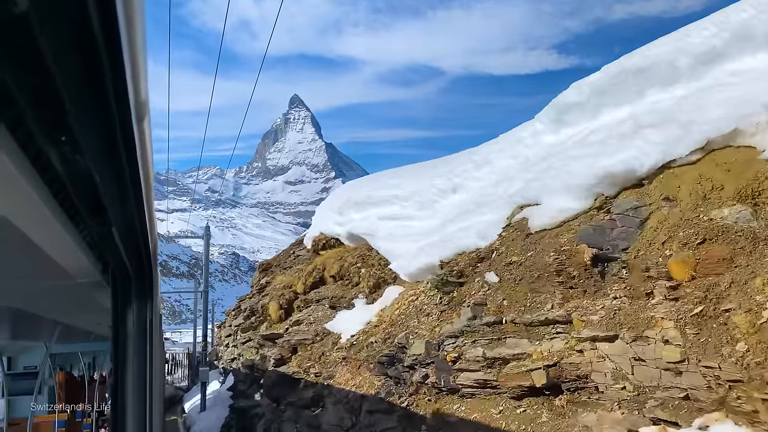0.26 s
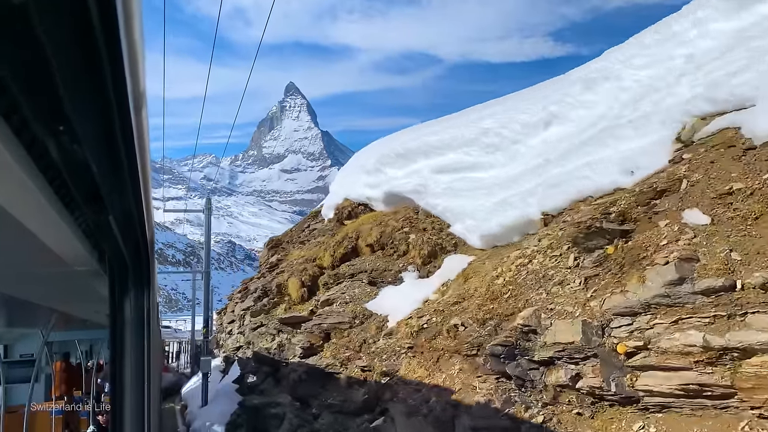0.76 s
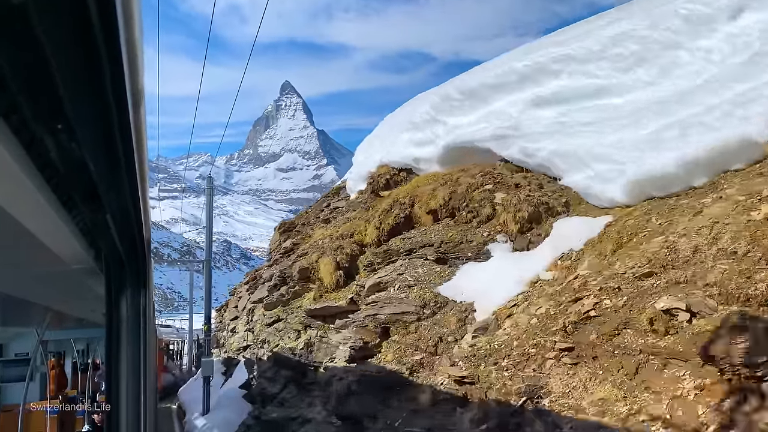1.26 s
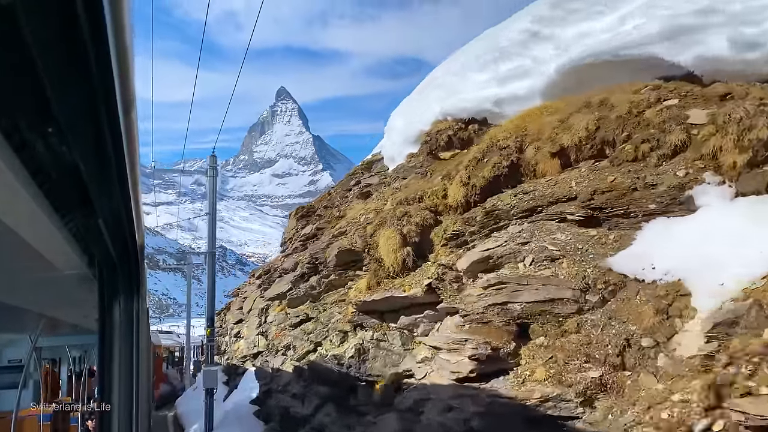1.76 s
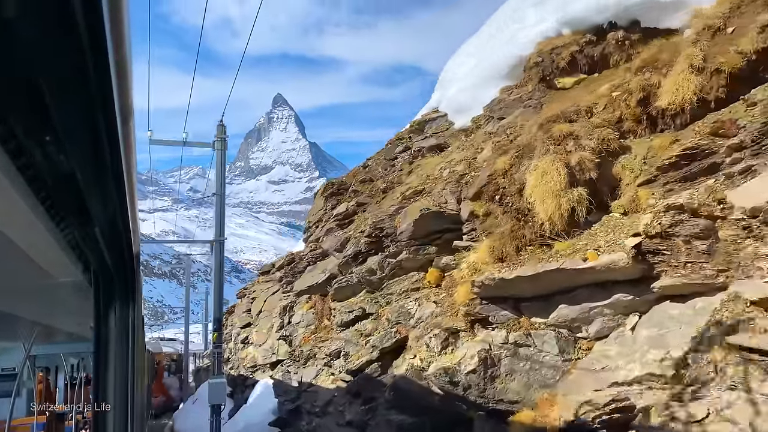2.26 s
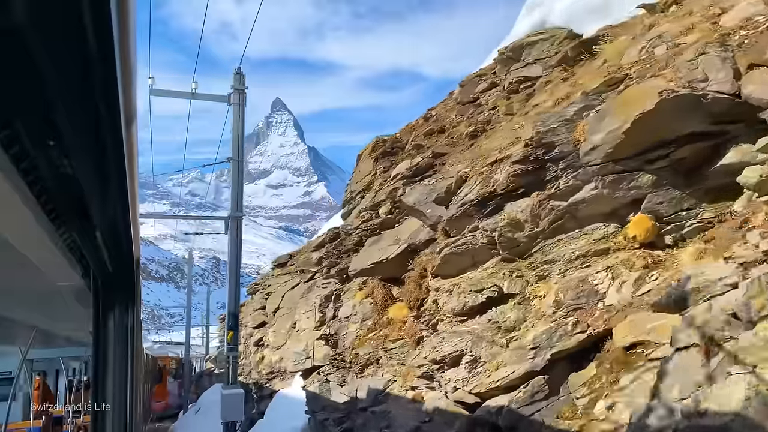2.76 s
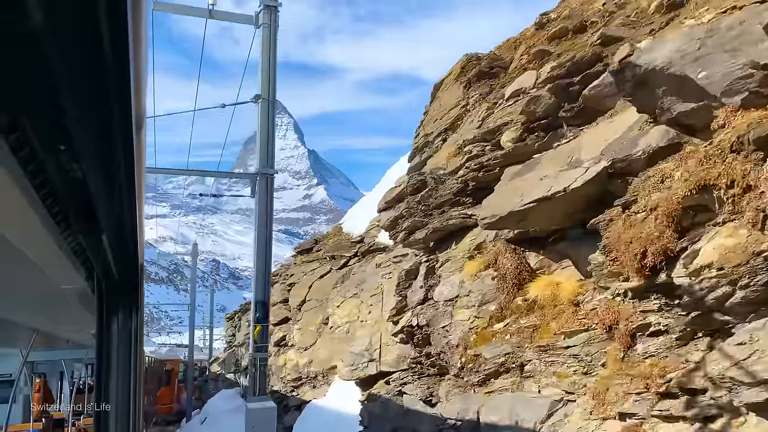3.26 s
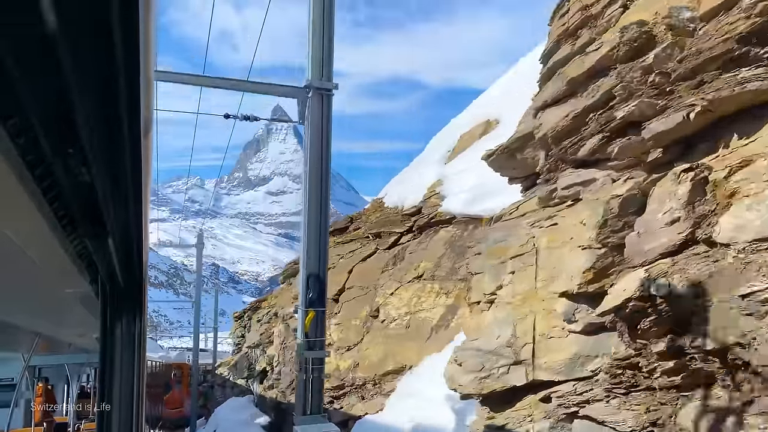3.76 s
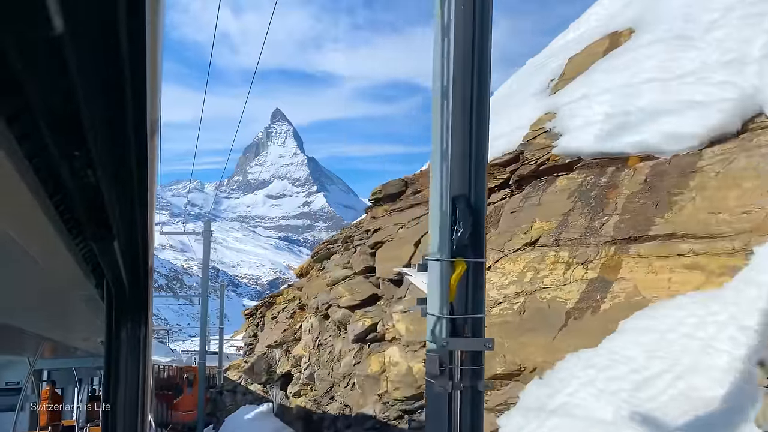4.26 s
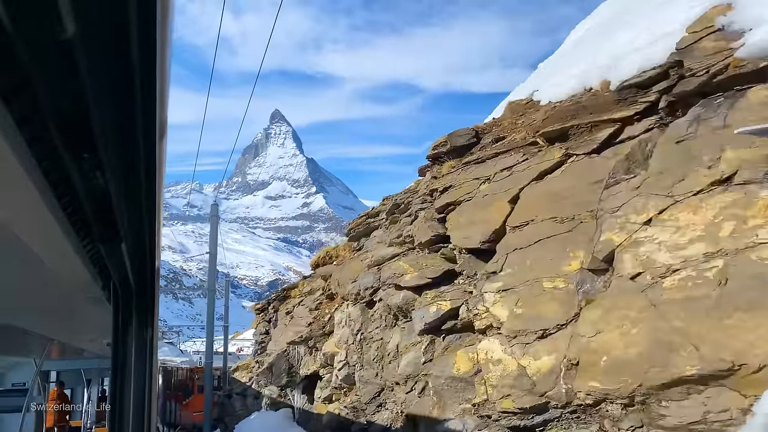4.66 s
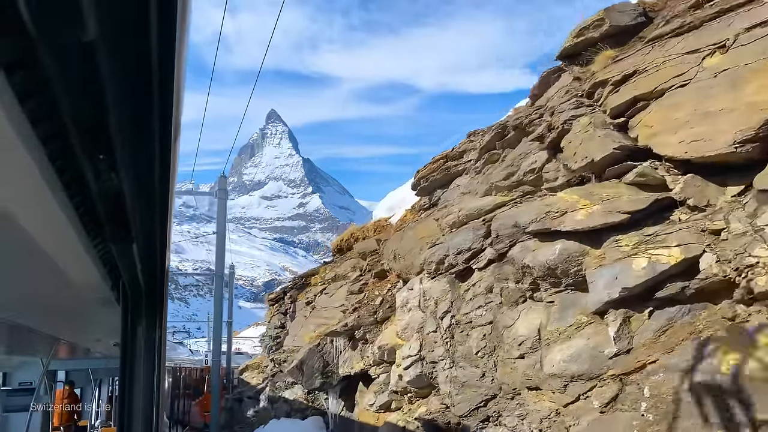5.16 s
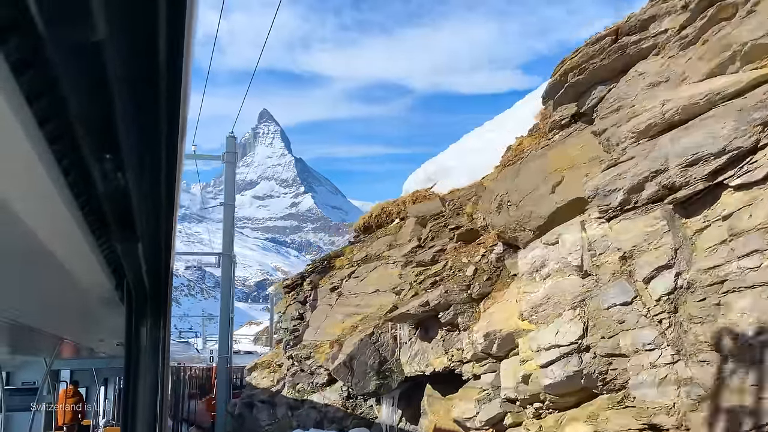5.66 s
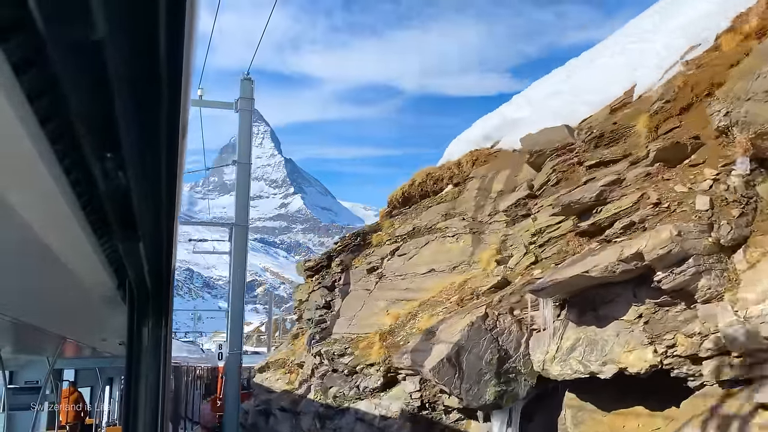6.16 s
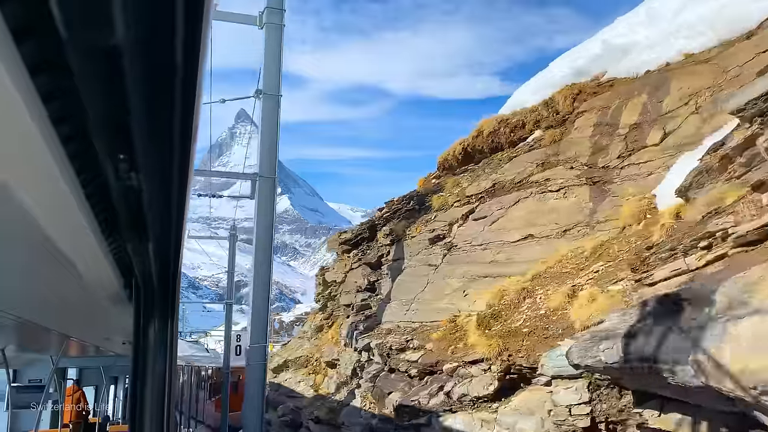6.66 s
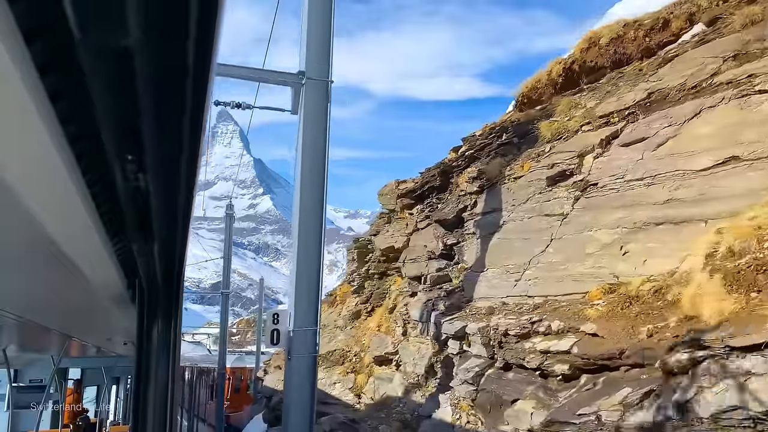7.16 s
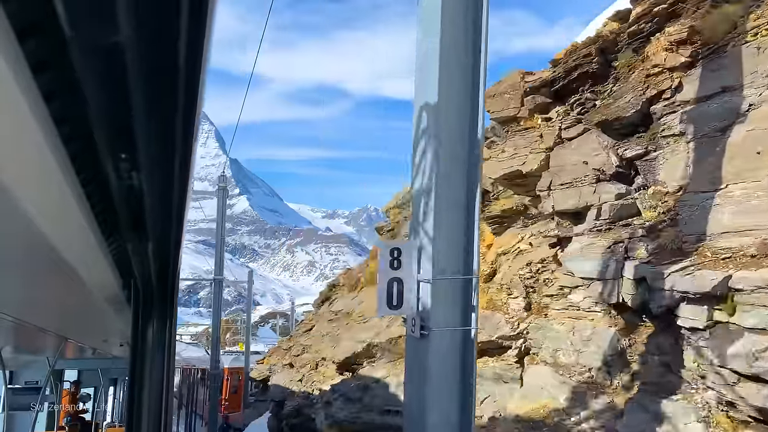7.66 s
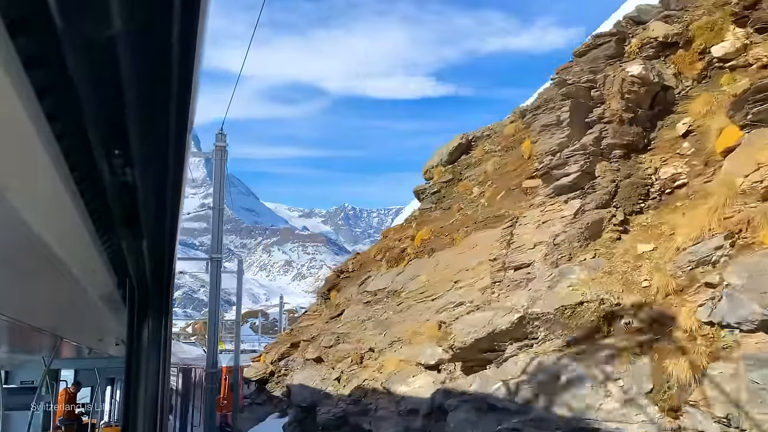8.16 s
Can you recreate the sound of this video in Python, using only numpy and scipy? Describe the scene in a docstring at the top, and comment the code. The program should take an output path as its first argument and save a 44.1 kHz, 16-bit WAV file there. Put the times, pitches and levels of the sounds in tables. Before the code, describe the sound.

Close at an open carriage window, an electric rack train climbs steadily past a rock wall. Deep floor boom, bogie roar and a wavering cog-tooth drone dominate, under rolling noise and faint steel fizz. Light scuffs come early, an air valve hisses off at about two and a half seconds, dull knocks thump near six, and a wheel flange scrapes and squeals thinly towards the end.

```python
"""A rumbling carriage floor and droning cog teeth, as an electric rack train climbs past a rock cutting.
Close by, at an open carriage window, come boom and roar from below, rolling, steel fizz, gear whine
and a faint inverter whine, all as shaped noise; the teeth are wandering, beating tones.
Scuffs are noise puffs, pings and knocks short sines; an air valve blows off once as a fading noise jet.
Near the end a wheel flange scrapes and sings as noise-driven resonances, and the rail groans upward."""
import sys
import numpy as np
from scipy import signal
from scipy.fft import rfft, irfft
from scipy.io import wavfile
from scipy.ndimage import uniform_filter1d

SR = 44100
rng = np.random.default_rng(int(sys.argv[2]) if len(sys.argv) > 2 else 0)


def materialize(psi):
    """Save the field psi as 16-bit PCM at rate SR to the path in sys.argv[1].

    A 1-D psi becomes a single channel; in a 2-D psi each row is a channel.
    """
    bounded = np.clip(np.atleast_2d(psi).T, -1, 1)
    quanta = np.round(bounded * 32767).astype(np.int16)
    wavfile.write(sys.argv[1], SR, quanta)


N = 370440  # samples

# Under the carriage, loudest where the rock wall stands close:
# (time [s], floor boom [dB], bogie roar [dB], bogie hums [dB], upper roar [dB])
BODY_LEVELS = [(0.0, -22, -22, -20.5, -31), (0.7, -22.5, -20, -20, -51), (1.7, -23, -22.5, -21.5, -41),
               (2.3, -23.5, -21.5, -22.5, -33), (2.8, -20.5, -20.5, -22.5, -31),
               (3.5, -23.5, -16.5, -18.5, -34.5), (4.1, -23, -19.5, -18, -33), (4.6, -20, -23, -24, -27.5),
               (5.1, -20, -25, -24, -32), (5.5, -18.5, -24, -26, -35.5), (6.0, -24.5, -23, -22, -29),
               (6.5, -18, -20.5, -25, -34), (7.0, -19.5, -24, -28, -33), (7.6, -20, -22.5, -24, -32),
               (8.4, -21, -22.5, -26, -27)]
# Colours of floor boom, bogie roar and upper roar: (frequency [Hz], density [dB per Hz])
BOOM_COLOUR = [(12, -71), (22, -26), (30, -1), (45, 5.5), (65, 14), (105, 10.5), (140, 3), (210, 5.5),
               (280, -23), (450, -54), (1500, -85)]
ROAR_COLOUR = [(60, -58), (150, 4), (250, 3.5), (360, 2), (450, 2), (520, -8.5), (650, -10), (800, -11),
               (1000, -39), (1400, -59), (4000, -86)]
UPPER_ROAR_COLOUR = [(250, -34), (480, 6), (600, 11), (750, 2), (1000, -24), (2000, -58)]
# Narrow gearbox and panel hums, riding on the floor boom: (frequency [Hz], width [Hz], level [dB])
FLOOR_HUMS = [(134.4, 28, -5), (185.5, 4.2, -12.5), (219.6, 20, -17)]
# Hums of the bogie: (frequency [Hz], width [Hz], level [dB])
BOGIE_HUMS = [(352, 42, -6), (423.6, 45, -13), (507, 34, -17), (573.6, 41, -18.5), (655, 30, -24),
              (866.7, 38, -17)]
SHAKE_DB, SHAKE_HZ = 0.63, 7.9  # rms depth and rate of the body's random shudder

# Cog teeth entering the rack:
# (time [s], 1st multiple of the tooth rate [dB], 2nd multiple [dB], 3rd multiple [dB])
COG_LEVELS = [(0.0, -27.5, -39, -30.5), (0.7, -19, -24, -31.5), (1.3, -30.5, -27, -29.5),
              (1.85, -22.5, -25.5, -26.5), (2.4, -25, -25.5, -30), (3.0, -25, -24, -37),
              (3.6, -30.5, -33, -34), (4.03, -25.5, -15.5, -40), (4.2, -34.5, -27.5, -24.5),
              (4.6, -26, -23, -28), (4.95, -45, -22, -42.5), (5.17, -44, -27, -19), (5.4, -34, -20, -35.5),
              (5.7, -18, -34, -41), (5.95, -25, -31, -17.5), (6.3, -19, -36, -49), (6.7, -44, -23.5, -31.5),
              (7.05, -16.5, -21, -26.5), (7.5, -25.5, -34, -51), (7.9, -21.5, -34, -42),
              (8.4, -35, -32, -55)]
TEETH_HZ = 83.5  # mean tooth rate
BEAT_DB, BEAT_HZ = -3.5, 8.6  # the other pinions, in and out of step with the nearest one

# The track, thrown back by the rock wall:
# (time [s], rolling [dB], fizz of steel on steel [dB], gear whine [dB])
TRACK_LEVELS = [(0.0, -33, -45.5, -48), (0.8, -34, -49, -44.5), (1.5, -34.5, -48.5, -45),
                (2.1, -32.5, -46, -45.5), (2.7, -32.5, -47, -43), (3.5, -33.5, -44, -43),
                (4.5, -31.5, -44.5, -49), (5.2, -33, -46, -49), (6.0, -34, -45.5, -46),
                (6.7, -34.5, -46.5, -49), (7.0, -36, -48.5, -50), (7.5, -34.5, -46.5, -52),
                (8.1, -31, -44, -57), (8.4, -31.5, -46.5, -45)]
# Colours of rolling and fizz: (frequency [Hz], density [dB per Hz])
ROLL_COLOUR = [(200, -70), (500, -18), (800, 3.5), (1000, 2), (1400, -3), (1660, -2.5), (2050, -5.5),
               (2500, -12), (3100, -16), (4500, -54), (9000, -68)]
FIZZ_COLOUR = [(900, -70), (2200, -15), (3200, -2), (3900, 0), (4500, -4), (5500, -9), (7400, -12),
               (8600, -12), (9300, -14), (10300, -13), (11500, -17), (12500, -21), (13500, -22.5),
               (14500, -25), (15800, -30)]
# Inverter switching tone, sidebands and double, relative to the fizz:
# (frequency [Hz], width [Hz], level [dB])
INVERTER_TONES = [(3860, 50, -15), (4000, 18, -20), (4010, 240, -12), (4153, 20, -20), (8030, 250, -18)]
# Resonances of the gear whine: (frequency [Hz], width [Hz], level [dB])
GEAR_TONES = [(1610, 24, -3), (1668, 18, -5.5), (1748, 55, -7.5)]

# Short scuffs at rail joints; level before the rise, treble relative to the dull part:
# (time [s], level [dB], rise [s], fall by 60 dB [s], treble [dB])
SCUFF_EVENTS = [(1.145, -39, .02, 0.24, -1), (1.64, -35.5, .025, 0.46, -2), (2.0, -31, 0.06, 0.57, -5),
                (2.16, -45, .015, 0.27, -4), (4.49, -38, 0.018, .3, -6), (4.755, -35.5, .004, .2, -4)]
# Colour of the scuffs: (frequency [Hz], density [dB per Hz])
SCUFF_COLOUR = [(500, -70), (1500, -15), (3500, 1), (5000, -4), (6500, -12), (9000, -13), (12000, -13),
                (15800, -21)]
SCUFF_TOP_HZ = 5500  # split between dull and treble
# Brief metallic rings: (time [s], length [s], pitch [Hz], level [dB])
PING_EVENTS = [(1.64, .1, 5050, -55), (4.45, .1, 1645, -37), (4.73, .08, 2560, -46)]

# Colour of the air jet: (frequency [Hz], density [dB per Hz])
JET_COLOUR = [(600, -70), (1500, -25), (3000, -4), (4500, -3), (7600, -3), (8500, 0), (11500, 0),
              (12500, -1), (13500, -3), (14500, -5), (15800, -5)]
VALVE_S, OPEN_S = 2.436, 0.02  # start and opening time constant [s]
JET_BODY_HZ = 7000  # split between dull body and thin top
TOP_DB, TOP_T60 = -32, 0.73  # the thin top drops quickly; T60 in s
BODY_DB, BODY_T60 = -33, 1.3  # the duller body lingers
LEAK_DB, LEAK_T60 = -44, 4.7  # a long leak under both

# Dull knocks under the floor, level before the rise:
# (time [s], level [dB], pitch [Hz], fall by 60 dB [s])
KNOCK_EVENTS = [(5.741, -10.5, 380, 0.14), (5.826, -2, 387, 0.079), (5.967, -11.5, 375, 0.14)]

# Flange rubbing the rail: (time [s], scrape [dB], high modes [dB], low modes [dB],
# 4.7 kHz mode [dB], squeal of the 5.7 kHz mode [dB])
FLANGE_LEVELS = [(6.4, -73, -78, -77, -72, -80), (6.6, -57, -68, -60, -62, -72),
                 (6.73, -51, -66, -55, -48, -72), (6.84, -72, -82, -72, -68, -80),
                 (7.05, -69, -71, -66, -68, -78), (7.2, -60, -68, -62, -64, -58),
                 (7.28, -56, -59, -50, -50, -66), (7.4, -45, -59.5, -58, -61, -66),
                 (7.62, -52, -53, -54, -58, -52), (7.8, -58, -58, -53, -64, -59),
                 (8.03, -56, -57.5, -51, -64, -54), (8.1, -48, -55.5, -50, -55.5, -43),
                 (8.18, -45, -60, -49, -54, -56), (8.3, -46, -57.5, -53, -51, -58),
                 (8.4, -55, -60, -53, -54, -65)]
# Colour of the scrape: (frequency [Hz], density [dB per Hz])
SCRAPE_COLOUR = [(1000, -70), (3000, -12), (5000, -3), (8000, -1), (12500, 0), (14000, -1), (15800, -2)]
# Modes of the wheel: (frequency [Hz], width [Hz], level [dB])
WHEEL_MODES = [(2690, 60, -2), (3645, 70, -1), (4650, 110, 0), (5695, 65, -1), (6760, 180, 3),
               (7835, 160, -2), (8600, 250, -5), (8930, 100, -1), (10080, 170, -1), (11160, 200, -2),
               (11600, 120, -7), (12340, 200, 0), (12750, 250, -6), (13450, 200, -6), (14600, 200, -9),
               (15250, 250, -7)]
# The rail's one upward groan under the flange: (time [s], pitch [Hz], level [dB])
GROAN_CURVE = [(8.1, 1015, -60), (8.15, 1050, -40), (8.2, 1160, -38), (8.24, 1260, -41), (8.3, 1320, -58)]
GROAN_WIDTH_HZ = 110

# Stereo likeness of left and right: (frequency [Hz], likeness [0-1])
STEREO_LIKENESS = [(30, .66), (150, .68), (400, .87), (900, .75), (1400, .62), (1800, .2), (2200, .55),
                   (2600, .2), (3900, .42), (5000, .25), (7900, .15), (8250, 1), (16000, 1)]
# Stereo phase by which the right leads, falling steadily above 8 kHz: (frequency [Hz], lead [rad])
RIGHT_LEAD = [(0, 0), (1800, 3.1), (2200, 3.9), (3000, 3.8), (4000, 6.3), (5000, 7.7), (6100, 9.4),
              (7100, 12.3), (8000, 16.75), (16000, 6.0)]
# Stereo balance, left minus right: (frequency [Hz], level difference [dB])
LEFT_LEAN = [(30, -2), (150, 3), (400, 1), (700, -1.5), (1200, 0), (2000, 6), (2600, 3), (4500, 1),
             (5300, 3.5), (7000, 0), (7950, -8), (8200, 0), (16000, 0)]
EDGE_HZ = 15740  # upper band limit
PAD, FADE_S = 4096, .004  # mirrored run-in and run-out [samples]; fade at both ends [s]


def gain_of(db):
    """Turns decibels into gain."""
    return 10 ** (np.asarray(db) / 20)


def evened(x):
    """Scales to rms 1."""
    return x / np.sqrt(np.mean(x ** 2) + 1e-20)


def read(points, hz):
    """Reads a frequency table on a log-frequency axis."""
    f, value = np.transpose(points)
    return np.interp(np.log(hz + 1), np.log(f + 1), value)


def follow(rows):
    """Turns a table over time into one track a column."""
    s, *columns = np.transpose(rows)
    return [np.interp(np.arange(N) / SR, s, c) for c in columns]


def drift(hz, size=N):
    """Slow random motion of rms about 1, low-passed near hz."""
    coarse = size // 64
    z = rfft(rng.standard_normal(coarse))
    rate = np.fft.rfftfreq(coarse, 64 / SR)
    slow = irfft(z / (1 + (rate / hz) ** 4), coarse)
    return evened(np.interp(np.arange(size) / 64, np.arange(len(slow)), slow))


def split(x, hz):
    """Parts x into what lies below and above hz."""
    z = rfft(x)
    low = 1 / (1 + (np.fft.rfftfreq(N, 1 / SR) / hz) ** 8)
    return irfft(z * low, N), irfft(z * (1 - low), N)


def noise(shape, size, patchy_db, flicker_db):
    """Two unrelated noises of one colour, sharing drifting patches and a flicker."""
    frames = 4 * N // size + 5
    hz = np.fft.rfftfreq(size, 1 / SR)
    z = rng.standard_normal((5, len(hz), frames))
    # patches are smooth across frequency, then across time
    patches = uniform_filter1d(z[4], size=size // 64, axis=0)
    patches = evened(uniform_filter1d(patches, size=8192 // size, axis=1))
    flicker = evened(uniform_filter1d(rng.standard_normal(frames), size=4096 // size + 1))
    level_db = read(shape, hz)[:, None] + patchy_db * patches + flicker_db * flicker
    field = (z[:2] + 1j * z[2:4]) * gain_of(level_db)
    sound = signal.istft(field, nperseg=size, noverlap=size * 3 // 4)[1]
    return evened(sound[:, :N])


def rings(modes, flutter_db, flutter_hz, wander_hz=0, size=N):
    """Noise-driven resonances, each swelling by itself and straying in pitch by wander_hz (rms)."""
    hz = np.fft.rfftfreq(size, 1 / SR)
    out = np.zeros((2, size))
    white = rfft(rng.standard_normal((2, size)))
    for f, width, db in modes:
        ring = white / (1 + (2 * (hz - f) / width) ** 2)
        if wander_hz:
            # the one-sided spectrum gives a complex signal whose pitch can be turned
            turn = 2 * np.pi * np.cumsum(wander_hz * drift(flutter_hz, size)) / SR
            ring = (np.fft.ifft(ring, size) * np.exp(1j * turn)).real
        else:
            ring = irfft(ring, size)
        out += gain_of(db + flutter_db * drift(flutter_hz, size)) * evened(ring)
    return out


def body():
    """Broad noise of the shaken floor and bogie, with narrow hums where parts resonate."""
    boom_db, roar_db, hums_db, upper_db = follow(BODY_LEVELS)
    boom = gain_of(-2.5) * noise(BOOM_COLOUR, size=4096, patchy_db=1.1, flicker_db=1.0)
    boom = boom + rings(FLOOR_HUMS, flutter_db=-1.35, flutter_hz=0.47)
    roar = gain_of(roar_db) * noise(ROAR_COLOUR, size=2048, patchy_db=0.56, flicker_db=-0.5)
    roar += gain_of(hums_db) * rings(BOGIE_HUMS, flutter_db=2.0, flutter_hz=3.3, wander_hz=8)
    roar += gain_of(upper_db) * noise(UPPER_ROAR_COLOUR, size=2048, patchy_db=0.3, flicker_db=0.8)
    # floor and bogie shudder separately
    floor = gain_of(boom_db + SHAKE_DB * drift(SHAKE_HZ)) * boom
    return floor + gain_of(SHAKE_DB * drift(SHAKE_HZ)) * roar


def cogs():
    """Tooth-rate tones; play in the drive lets the phase wander, and other pinions beat against them."""
    out = np.zeros((2, N))
    turns = np.arange(N) * TEETH_HZ / SR
    for k, db in enumerate(follow(COG_LEVELS)):
        others = (drift(BEAT_HZ) + 1j * drift(BEAT_HZ)) / np.sqrt(2)
        beat = 1 + gain_of(BEAT_DB) * others
        level = gain_of(db) * np.sqrt(2 / np.mean(abs(beat) ** 2))
        for view in out:
            wander = np.cumsum(1.793 * drift(3.9)) / SR
            wander = wander - uniform_filter1d(wander, size=4 * SR)  # takes out the slow part
            phase = 2 * np.pi * (k + 1) * (turns + wander)
            view += level * (beat * np.exp(1j * phase)).real
    return out


def track():
    """Rolling noise and steel fizz, with narrow inverter tones that follow the fizz level."""
    roll_db, fizz_db, _ = follow(TRACK_LEVELS)
    roll = gain_of(roll_db) * noise(ROLL_COLOUR, size=1024, patchy_db=1.18, flicker_db=.8)
    texture = noise(FIZZ_COLOUR, size=512, patchy_db=.8, flicker_db=.6)
    inverter = rings(INVERTER_TONES, flutter_db=-0.5, flutter_hz=2.8)
    return roll + gain_of(fizz_db) * (texture + inverter)


def gear():
    """A rough whine near 1.7 kHz from noise-driven resonances that come and go."""
    whine_db = follow(TRACK_LEVELS)[2]
    return gain_of(whine_db) * rings(GEAR_TONES, flutter_db=2.5, flutter_hz=3.7)


def scuffs():
    """Soft puffs of friction noise, each with its treble held below the dull part."""
    t = np.arange(N) / SR
    level, top = np.zeros(N), np.zeros(N)
    for s, db, rise, t60, top_db in SCUFF_EVENTS:
        age = np.maximum(t - s, 0)
        puff = gain_of(db - 60 * age / t60) * (1 - np.exp(-age / rise))
        level += puff
        top += gain_of(top_db) * puff
    friction = noise(SCUFF_COLOUR, size=256, patchy_db=-0.5, flicker_db=-1.5)
    dull, bright = split(friction, SCUFF_TOP_HZ)
    return level * dull + top * bright


def pings():
    """Thin metallic sine tones that swell and fade within a tenth of a second."""
    t, out = np.arange(N) / SR, np.zeros(N)
    for s, length, hz, db in PING_EVENTS:
        swell = np.sqrt(abs(np.sin(np.pi * np.clip((t - s) / length, 0, 1))))
        out += gain_of(db) * swell * np.sin(2 * np.pi * hz * t)
    return out


def valve():
    """A jet of air that opens fast and fades as the pressure drops, the thin top first."""
    age = np.maximum(np.arange(N) / SR - VALVE_S, 0)
    leak = gain_of(LEAK_DB - 60 * age / LEAK_T60)
    dull, thin = split(noise(JET_COLOUR, size=256, patchy_db=1.3, flicker_db=.45), JET_BODY_HZ)
    jet = (gain_of(BODY_DB - 60 * age / BODY_T60) + leak) * dull
    jet += (gain_of(TOP_DB - 60 * age / TOP_T60) + leak) * thin
    return (1 - np.exp(-age / OPEN_S)) * jet


def knocks():
    """Soft blows that ring one floor panel briefly as decaying sines."""
    t, out = np.arange(N) / SR, np.zeros(N)
    for s, db, hz, t60 in KNOCK_EVENTS:
        age = np.maximum(t - s, 0)
        rise = 1 - np.exp(-age / 0.009)
        out += gain_of(db - 60 * age / t60) * rise * np.sin(2 * np.pi * hz * age)
    return out


def flange():
    """Stick-slip at the flange scrapes as noise and rings the wheel; the modes waver, catch and let go."""
    scrape_db, high_db, low_db, fourth_db, squeal_db = follow(FLANGE_LEVELS)
    start_s = FLANGE_LEVELS[0][0]
    onset = np.clip((np.arange(N) / SR - start_s) / 0.13, 0, 1)
    touch = gain_of(1.1 * drift(11)) * onset
    out = gain_of(scrape_db) * noise(SCRAPE_COLOUR, size=256, patchy_db=1.2, flicker_db=1.2)
    size = N - int(start_s * SR)  # the wheel rings only from the first touch on
    groups = [(WHEEL_MODES[:2], low_db, 15), (WHEEL_MODES[2:3], fourth_db, 25),
              (WHEEL_MODES[3:4], squeal_db, 20), (WHEEL_MODES[4:], high_db, 35)]
    for modes, db, wander_hz in groups:
        ringing = rings(modes, flutter_db=1.6, flutter_hz=20, wander_hz=wander_hz, size=size)
        out[:, -size:] += gain_of(db[-size:]) * ringing
    return touch * out


def groan():
    """A fuzzy tone sliding upward: low-passed complex noise carried on a moving pitch."""
    hz, db = follow(GROAN_CURVE)
    t = np.arange(N) / SR
    r = np.exp(-np.pi * GROAN_WIDTH_HZ / SR)
    white = rng.standard_normal((2, N)) + 1j * rng.standard_normal((2, N))
    fuzz = signal.lfilter([1], [1, -2 * r, r * r], white)
    carrier = np.exp(2j * np.pi * np.cumsum(hz) / SR)
    inside = (t > GROAN_CURVE[0][0]) & (t < GROAN_CURVE[-1][0])
    return inside * gain_of(db) * evened((fuzz * carrier).real)


def scene():
    """Sums two views of the field at the window; knocks and pings are alike in both."""
    running = body() + cogs() + track() + gear()
    return running + scuffs() + pings() + valve() + knocks() + flange() + groan()


def record(dry):
    """Makes stereo: the channels share part of the sound with a phase lead; above 8 kHz both carry one signal."""
    longer = np.pad(dry, [(0, 0), (PAD, PAD)], "reflect")
    size = longer.shape[1]
    hz = np.fft.rfftfreq(size, 1 / SR)
    first, second = rfft(longer)
    same = np.clip(read(STEREO_LIKENESS, hz), 0, 1)
    lead = np.interp(hz, *np.transpose(RIGHT_LEAD))
    right = same * np.exp(1j * lead) * first + np.sqrt(1 - same ** 2) * second
    half_lean_db = read(LEFT_LEAN, hz) / 2
    stereo = irfft([first * gain_of(half_lean_db), right * gain_of(-half_lean_db)], size)
    # fade both ends, then limit the band
    to_edge = N / 2 - abs(np.arange(-PAD, N + PAD) - N / 2)
    stereo *= np.clip(to_edge / (FADE_S * SR), 0, 1)
    low_pass = signal.firwin(1023, EDGE_HZ, window=("kaiser", 9), fs=SR)
    return signal.oaconvolve(stereo, low_pass[None], "same")[:, PAD:PAD + N]


dry = scene()
out = record(dry)
materialize(out)
```